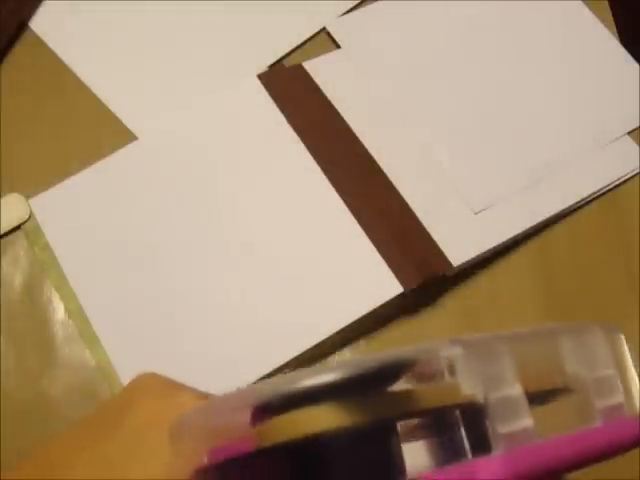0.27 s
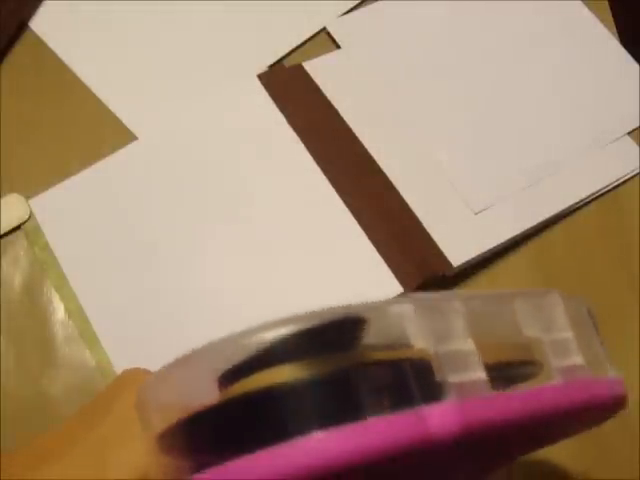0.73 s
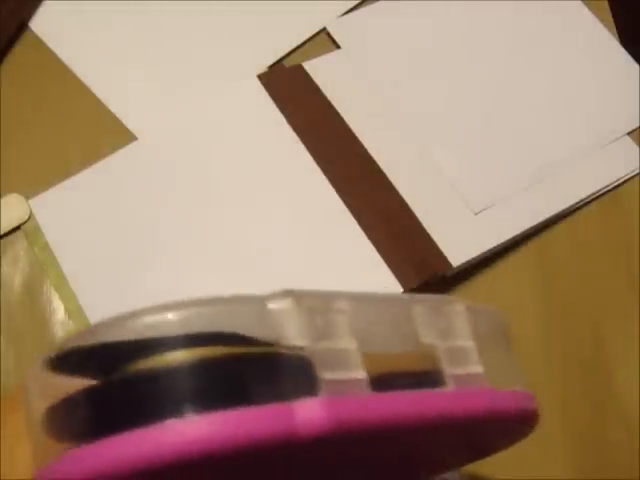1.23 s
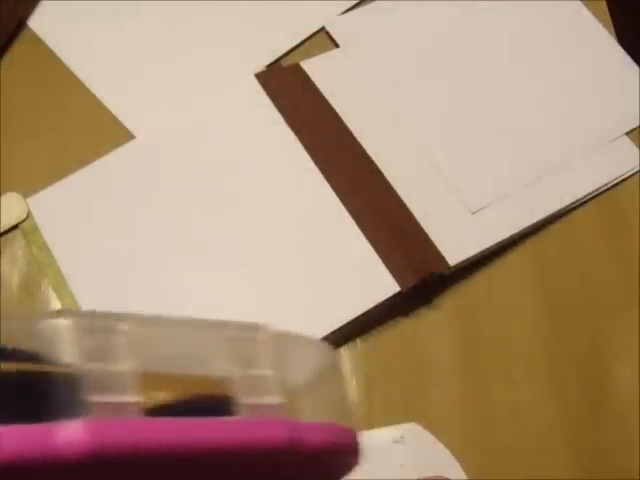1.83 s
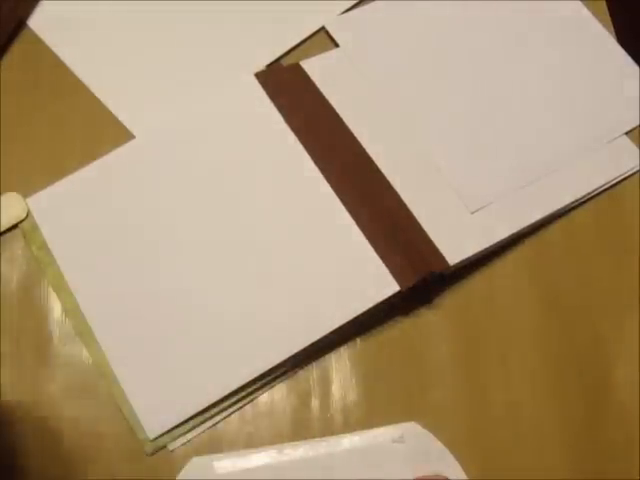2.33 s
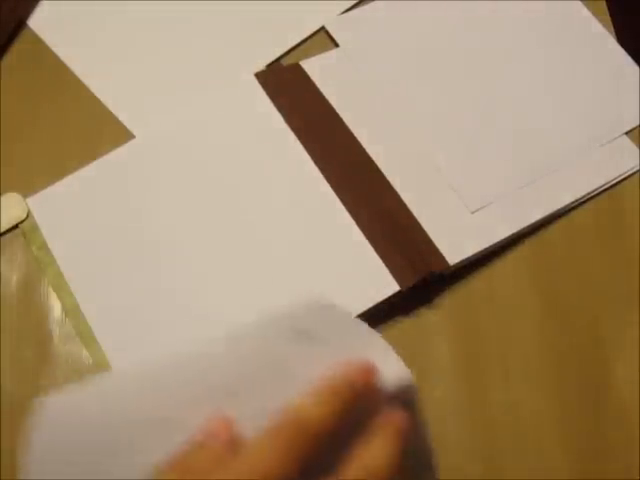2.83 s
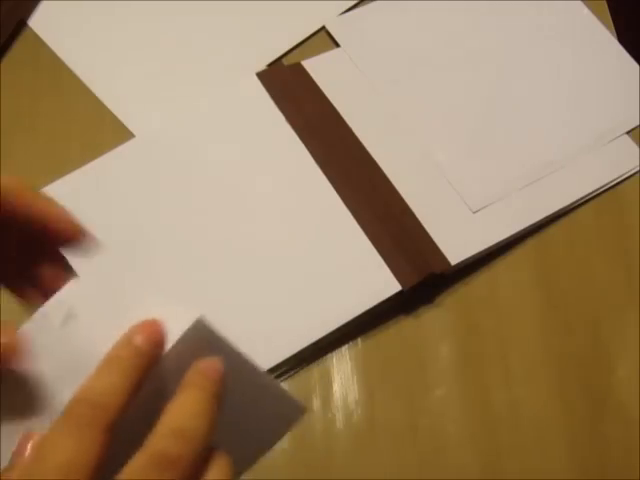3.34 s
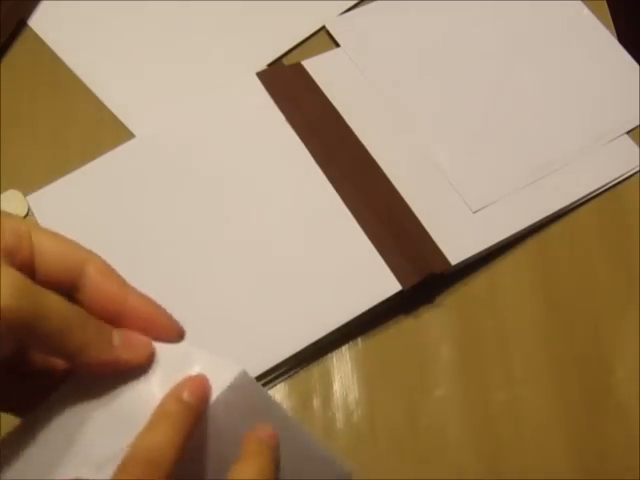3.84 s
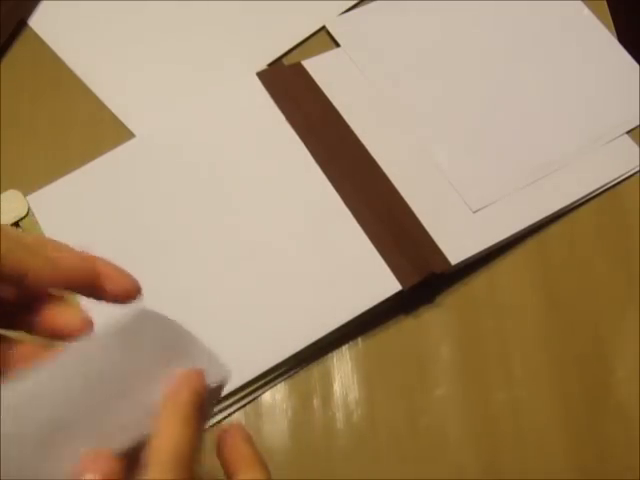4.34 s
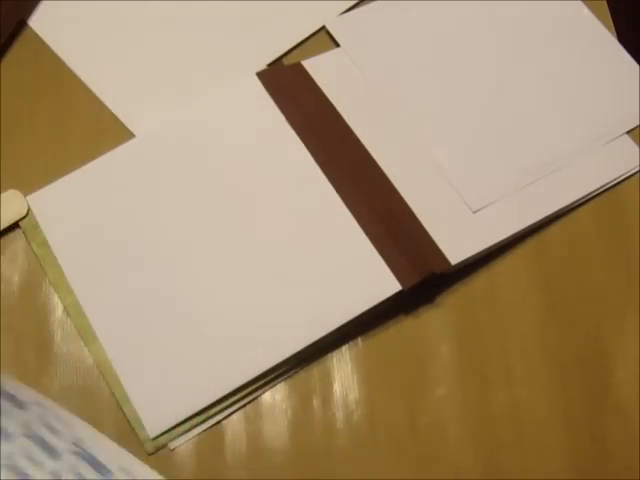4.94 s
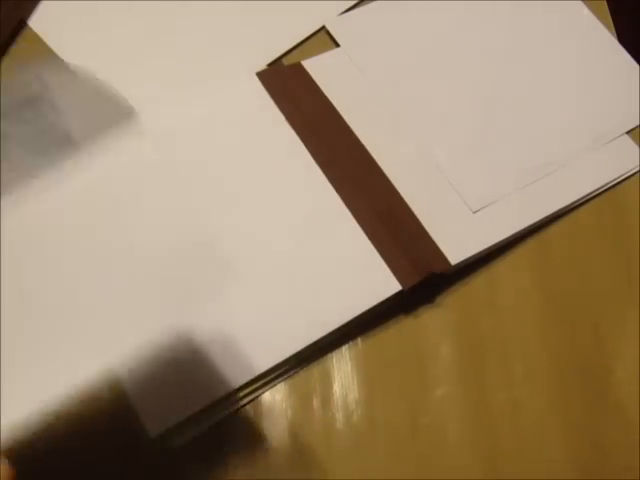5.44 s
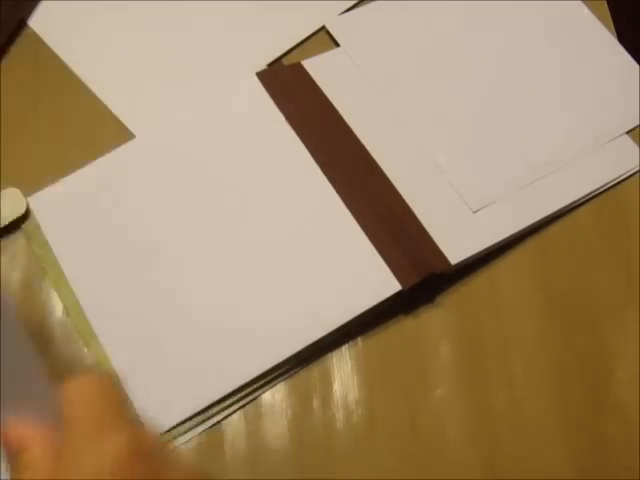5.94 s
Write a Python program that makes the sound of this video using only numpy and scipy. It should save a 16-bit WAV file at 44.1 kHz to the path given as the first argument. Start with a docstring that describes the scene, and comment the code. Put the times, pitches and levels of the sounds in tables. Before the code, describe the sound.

A low, steady rush of room air runs throughout, heard by one close microphone in a small room. For almost a second there is little else; around 0.95 s come tiny squeaks, then soft paper strokes and crisp snaps to 1.35 s, with a light knock. From about 1.6 to 1.9 s a tape gun rasps in quickening pulses, swelling and weakening over a thin hiss. At 2.05 s a brief rising squeak meets a hard plastic knock. After a pause, heavier clunks on the wooden table fall at 2.5-3.0 s, the strongest just before 3.0, then small knocks rattle away by 3.3 s. From 3.45 s paper ticks, rubs and pops, more briskly to 4.5 s. Between 4.8 and 5.75 s the sheet rustles and turns over with loud sharp snaps near 5.1 and 5.7 s, and a knock at 5.5. A last slide, soft knock and low flexing hum come around 6.05 s.

```python
"""A low steady rush fills a small room. At first paper slides and snaps, with faint squeaks and a knock.
Then a tape gun rasps in quick pulses and squeaks; it clatters on a wooden table and rocks to rest.
Last, the taped sheet is slid, pressed and turned over: it rustles, snaps and flexes, with two late knocks.
Rubbing and hits are shaped noise, snaps are ringing pushes, squeaks are gliding tones,
and the table rings with fading sine waves. One close microphone hears it all."""
import sys
import numpy as np
from scipy import signal
from scipy.fft import rfft, irfft
from scipy.io import wavfile
from scipy.ndimage import uniform_filter1d

SR = 44100
rng = np.random.default_rng(int(sys.argv[2]) if len(sys.argv) > 2 else 0)


def output_pcm(signal):
    """Save a mono or channel-first signal as 16-bit PCM at the path in sys.argv[1].

    Samples are clipped to [-1, 1] before scaling.
    """
    pcm = np.clip(np.atleast_2d(signal).T, -1, 1) * 32767
    wavfile.write(sys.argv[1], SR, np.round(pcm).astype(np.int16))


N = 272846

# colour of the room's steady rush: (frequency [Hz], relative level [dB])
RUSH_COLOUR = [(18, -65), (30, -33.5), (161, -12.5), (191, -12), (245, -8.5), (422, -7), (477, -8.5),
               (582, -4.5), (626, -7.5), (1130, -9), (2560, -13), (2900, -14.5), (4090, -19), (7980, -20.5),
               (11000, -27), (14300, -84), (22000, -120)]
# how long the room's echoes take to fade by 60 dB: (frequency [Hz], fading time [s])
ROOM_FADING = [(200, 0.34), (550, 0.31), (1400, 0.19), (3700, 0.29), (10000, 0.26)]
# strokes of sliding paper: (fastest moment [s], build-up [s], release [s], level [dB])
PAPER_STROKES = [(1.06, 0.19, 0.24, -46.5), (1.30, 0.22, 0.18, -42.5), (3.73, 0.12, 0.087, -43.5),
                 (3.91, 0.036, 0.061, -40), (4.135, .03, 0.046, -43), (4.225, 0.079, .1, -43),
                 (4.33, .13, 0.023, -36.5), (4.845, 0.087, 0.079, -38.5), (4.991, 0.11, .09, -38),
                 (5.085, 0.059, 0.041, -36), (5.441, 0.011, 0.023, -37), (5.485, 0.034, 0.096, -37),
                 (5.612, 0.072, 0.082, -39.5), (5.702, 0.044, 0.048, -34), (5.84, 0.08, .07, -44.5),
                 (6.049, 0.085, 0.11, -38)]
# colour of paper rubbing on paper: (frequency [Hz], relative level [dB])
PAPER_COLOUR = [(150, -13), (400, 1), (1000, -3.5), (2200, 1), (4500, -1.5), (7000, -2), (10000, -6.5)]
# tape and paper snapping:
# (time [s], level [dB], pitch [Hz], treble slope [dB per octave], bass slope [dB per octave])
SNAP_EVENTS = [(1.1007, -34, 7200, -1, -0.5), (1.216, -36.5, 4500, 4, 8), (1.2427, -36.5, 4970, 6, 16),
               (1.3095, -27.5, 4420, 11, 3.5), (1.3323, -21, 4230, 9.5, 0.5), (3.4523, -38, 3100, 11.5, 2),
               (3.7494, -20.5, 1140, 8, 0), (3.9054, -35.5, 2220, 11, 4), (3.9716, -35, 3000, 4.5, 2),
               (4.1154, -22.5, 2010, 13, 3), (4.3225, -24, 1320, 2.5, -2), (4.339, -31, 2900, 6, 1),
               (4.4805, -35, 2980, 8.5, -1.5), (4.8213, -37, 1990, 19, 1), (5.0274, -32.5, 5100, -4, -2),
               (5.052, -32.5, 5100, -2.5, 7), (5.092, -14.5, 3020, 3.5, -0.5), (5.4360, -33, 2170, 5, 11),
               (5.5767, -20.5, 2320, 1, 4.5), (5.7007, -14, 2470, 6.5, 12)]
# stick-slip squeaks and the hum of the flexing sheet:
# (middle [s], length [s], level [dB], start pitch [Hz], end pitch [Hz])
SQUEAK_EVENTS = [(0.955, 0.022, -40, 580, 624), (0.981, 0.011, -29.5, 596, 643),
                 (2.041, 0.014, -26, 1153, 1265), (2.039, 0.0082, -20, 2295, 3445),
                 (6.097, 0.022, -30, 220, 211)]
# short scrapes of the tape gun and the sheet's edge: (middle [s], length [s], level [dB], resonance [Hz])
SCRAPE_EVENTS = [(0.987, 0.021, -39, 2540), (1.595, 0.029, -41.5, 1570), (1.997, 0.01, -29.5, 1310),
                 (2.047, 0.016, -36, 3000), (3.921, 0.029, -37, 2150), (4.295, 0.024, -34.5, 2110),
                 (4.33, 0.015, -31.5, 900), (5.136, 0.015, -28, 1510), (5.475, 0.01, -24, 1480),
                 (5.491, 0.015, -24.5, 1140), (5.707, 0.017, -34, 2280), (6.076, 0.073, -41.5, 1750)]
# tape gun and hands knocking on the table:
# (time [s], level [dB], brightest [Hz], bass cut [Hz], level of the sharp crack [dB])
KNOCK_EVENTS = [(1.3318, -28, 2140, 354, -7.5), (2.0666, -14, 1550, 445, -10), (2.085, -37, 1300, 400, 6),
                (2.1023, -19.5, 1750, 504, -24), (2.1290, -36, 900, 420, -13),
                (2.4845, -34.5, 1130, 338, -16), (2.5816, -40, 980, 400, -6.5),
                (2.7353, -16, 1220, 240, 4.5), (2.7440, -15, 600, 190, -27),
                (2.7913, -21, 1350, 300, -10.5), (2.9724, -8.5, 1130, 414, -22),
                (3.0208, -16.5, 1650, 1160, -4), (3.4081, -44, 1600, 800, -21),
                (5.521, -29.5, 1300, 278, -2), (6.0520, -30.5, 980, 398, -14)]
# what the table and the tape gun ring with: (frequency [Hz], relative level [dB])
TABLE_MODES = [(208, 5), (268, -6), (378, -13), (435, 4), (506, 6.5), (658, 4), (745, 2.5), (818, -29),
               (1179, -3.5), (1290, 3.5), (1420, -20), (1560, -39), (1755, 2), (2090, -17)]
# colour of the sharp crack in a knock: (frequency [Hz], relative level [dB])
CRACK_COLOUR = [(200, -21), (900, -2), (2200, 0), (3800, 1.5), (5200, 3), (7000, -2), (10000, -12.5)]
# how long the clatter takes to fade by 60 dB: (frequency [Hz], fading time [s])
CLATTER_FADING = [(300, 0.073), (1200, 0.073), (3000, 0.03), (10000, 0.022)]

RUSH_DB = -50
EDGE_HZ = 11200  # the microphone passes little above this
# the hiss of the tape paying out, and the moment the hand presses most
TAPE_HISS_DB, TAPE_HISS_S, PRESS_S = -42.5, 0.1, 1.772
STROKE_CURVE = 1.64  # above 1, a stroke starts gently
# a taut sheet snaps loud and clean, a slack one shivers more: the level with no change, and the trade
SHIVER_EVEN_DB, SHIVER_SLOPE = -24, 0.88
# the roller slips in pulses: the settled gap, the extra first gap, and how much of it stays each time
ROLL_START_S, ROLL_GAP_S, ROLL_LAG_S, ROLL_SETTLE = 1.657, .0205, .0395, .19
# pulses are loudest at the press and weaken on both sides of it
PRESS_DB, PRESS_DB_PER_S, LIFT_DB_PER_S = -28, 102, 129
SLIP_SHARE, ROLL_HZ = 0.55, 1140  # slip length as a share of the gap, and its resonance
# once set down, the gun rocks to rest: each bounce comes sooner and weaker than the last
ROCK_START_S, ROCK_GAP_S, ROCK_SHRINK = 3.0885, .0348, .968
ROCK_DB, ROCK_STEP_DB = -28, -2.5
ROCK_HZ, ROCK_LOW_HZ, ROCK_CRACK_DB = 1410, 470, -12


def amp(db):
    """Turns decibels into a plain gain."""
    return 10 ** (np.asarray(db) / 20)


def evened(x):
    """Scales a sound to an average (rms) strength of 1."""
    return x / np.sqrt(np.mean(x ** 2) + 1e-20)


def struck(x):
    """Scales a hit to rms 1 over its first 5 ms."""
    return x / np.sqrt(np.mean(x[:SR // 200] ** 2) + 1e-20)


def read(points, hz):
    """Reads between the points of a table, on a log-frequency axis."""
    f, value = np.transpose(points)
    return np.interp(np.log(hz + 1), np.log(f), value)


def add(mix, s, sound):
    """Mixes a sound in, starting at s seconds."""
    part = mix[max(round(s * SR), 0):][:len(sound)]
    part += sound[:len(part)]


def bins(size):
    """Lists the frequencies of a spectrum, kept above zero."""
    return np.fft.rfftfreq(size, 1 / SR) + 1


def hill(f, hz, bass_db, treble_db):
    """Takes the lower of two slopes that cross at hz, in dB; the slopes are per octave."""
    octaves = np.log2(f / hz)
    return np.minimum(bass_db * octaves, -treble_db * octaves)


def peak(f, hz, height_db, width):
    """A resonance in dB, its half width given as a share of hz."""
    return height_db / (1 + ((f - hz) / (width * hz)) ** 2)


def low_cut(f, hz):
    """A small body sends out little sound below hz; the loss is in dB."""
    return -10 * np.log10(1 + (hz / f) ** 6)


def noise(db, size):
    """Makes noise of rms 1 with a given spectrum, by giving each frequency a random phase."""
    phase = np.exp(2j * np.pi * rng.random(len(db)))
    return evened(irfft(amp(db) * phase, size))


def click(db):
    """Makes the pulse that has a given spectrum and rings only after it starts."""
    log_gain = np.log(amp(np.maximum(db - db.max(), -70)))
    circle = np.concatenate([log_gain, log_gain[-2:0:-1]])
    # the Hilbert transform finds the phase that puts the energy as early as possible
    return np.fft.ifft(np.exp(np.conj(signal.hilbert(circle)))).real


def dying(x, fading):
    """Lets each band of x die away at its own speed."""
    hz, t, z = signal.stft(x, SR, nperseg=128)
    faded = z * amp(-60 * t / read(fading, hz)[:, None])
    return signal.istft(faded, SR, nperseg=128)[1][:len(x)]


def grains(size, per_s, spread_db):
    """Scatters sparse impulses of uneven strength, like fibres catching and letting go."""
    strength = amp(spread_db * np.minimum(rng.exponential(1, size), 4))
    chosen = rng.random(size) < per_s / SR
    return rng.standard_normal(size) * strength * chosen


def rush(hum_hz=590, hum_width_hz=12, hum_db=-64):
    """The steady air of the room is shaped noise; a narrow band of noise gives a faint wavering hum."""
    f = bins(N)
    hum = noise(-20 * np.log10(1 + ((f - hum_hz) / hum_width_hz) ** 2), N)
    return amp(RUSH_DB) * noise(read(RUSH_COLOUR, f), N) + amp(hum_db) * hum


def room(x, size=22050):
    """Scattered reflections build up over a few ms, then die away at a speed set for each band."""
    t, f = np.arange(size) / SR, bins(size)
    colour = hill(f, hz=2480, bass_db=-1, treble_db=3.5)
    taps = irfft(rfft(grains(size, per_s=4000, spread_db=3.5)) * amp(colour))
    tail = dying(taps, ROOM_FADING) * (1 - np.exp(-(t / 0.0044) ** 2))
    return signal.fftconvolve(x, tail / np.linalg.norm(tail))[:N]


def sliding_level(t):
    """Rubbing grows and stops with each paper stroke, and swells as tape pays out under the hand."""
    level = amp(TAPE_HISS_DB) * np.exp(-((t - PRESS_S) / TAPE_HISS_S) ** 2)
    for s, build, release, db in PAPER_STROKES:
        stroke = np.interp(t, [s - build, s, s + release], [0, 1, 0])
        level = level + amp(db) * stroke ** STROKE_CURVE
    return level


def slides():
    """Paper rubs with a fine hiss and coarser crinkles, coloured by an echo from the table just below."""
    level = sliding_level(np.arange(N) / SR)
    friction, f = rng.standard_normal(N), bins(N)
    for hz in np.geomspace(1500, 9500, num=8):  # each layer of crinkles has its own pitch
        colour = hill(f, hz, bass_db=2, treble_db=7.0)
        crinkles = rfft(grains(N, per_s=170, spread_db=3.0)) * amp(colour)
        friction = friction + amp(-9.5) * evened(irfft(crinkles, N))
    # the paper catches unevenly
    catch_db = 2.2 * evened(uniform_filter1d(rng.standard_normal(N), size=350))
    bounce = 1 + 0.26 * np.exp(-2j * np.pi * f * .0022)  # an echo 2.2 ms later
    spectrum = rfft(friction * amp(catch_db)) * amp(read(PAPER_COLOUR, f)) * bounce
    return level * evened(irfft(spectrum, N))


def snaps(size=4096):
    """The sheet buckles: one push rings a few cycles, then a brief shiver runs through the paper."""
    out, f, t = np.zeros(N), bins(size), np.arange(size) / SR
    for s, db, hz, treble_db, bass_db in SNAP_EVENTS:
        shiver_db = SHIVER_SLOPE * (SHIVER_EVEN_DB - db)
        # the second slope bends the treble further, higher up
        colour = hill(f, hz, bass_db, treble_db) + hill(f, 3.2 * hz, 0, treble_db)
        push = click(colour + peak(f, hz, height_db=7.0, width=0.093) + low_cut(f, hz=360))
        fade = amp(-15.0) * np.exp(-t / 0.0013) + amp(-30.5) * np.exp(-t / 0.015)
        shiver = amp(shiver_db) * rng.standard_normal(size) * fade
        shiver[0] = 1  # the push itself
        add(out, s, amp(db) * struck(signal.fftconvolve(push, shiver)[:size]))
    return out


def squeaks(size=8192, flutter=0.36):
    """Sticking and slipping gives short gliding tones, unsteady in pitch and strength."""
    out, t = np.zeros(N), (np.arange(size) - size / 2) / SR
    for s, length, db, start_hz, end_hz in SQUEAK_EVENTS:
        hz = np.interp(t, [-length / 2, length / 2], [start_hz, end_hz])
        wobbles = uniform_filter1d(rng.standard_normal((2, size)), size=40)
        jitter, grip = (evened(row) for row in wobbles)
        rough = hz / hz.clip(2500)  # high squeaks break up the most
        phase = 2 * np.pi * np.cumsum(hz * (1 + .035 * rough * jitter)) / SR
        overtone = amp(-17) * np.sin(2 * phase)
        tone = evened(np.sin(phase) * (1 + flutter * rough * grip) + overtone)
        add(out, s + t[0], amp(db) * tone * np.exp(-2 * (t / length) ** 2))
    return out


def rolling(count=9):
    """The tape roller slips as scrapes: shorter as it gathers speed, louder under pressure."""
    gaps = ROLL_GAP_S + ROLL_LAG_S * ROLL_SETTLE ** np.arange(count)
    times = ROLL_START_S + np.cumsum(gaps) - gaps
    before_db, after_db = PRESS_DB_PER_S * (times - PRESS_S), LIFT_DB_PER_S * (PRESS_S - times)
    levels = PRESS_DB + np.minimum(before_db, after_db)
    return [(s, SLIP_SHARE * gap, db, ROLL_HZ) for s, gap, db in zip(times, gaps, levels)]


def scrapes(size=8192):
    """Each slip is a swell of grains heard through a resonance of the case or the sheet."""
    out, f, t = np.zeros(N), bins(size), (np.arange(size) - size / 2) / SR
    for s, length, db, hz in SCRAPE_EVENTS + rolling():
        colour = hill(f, hz, bass_db=0.0, treble_db=4) + hill(f, hz=2770, bass_db=-1, treble_db=10)
        colour = colour + low_cut(f, hz=413) + peak(f, hz, height_db=6, width=0.07)
        grit = evened(irfft(rfft(grains(size, per_s=4200, spread_db=3.5)) * amp(colour)))
        swell = np.exp(-2 * (t / length) ** 2)
        slip = grit * swell
        # give every slip the energy of its swell
        add(out, s + t[0], amp(db) * slip * np.linalg.norm(swell) / np.linalg.norm(slip))
    return out


def rocking(count=6):
    """The gun rocks to rest in knocks that come sooner and weaker each time."""
    k = np.arange(count)
    gaps = ROCK_GAP_S * ROCK_SHRINK ** k
    times = ROCK_START_S + np.cumsum(gaps) - gaps
    levels = ROCK_DB + ROCK_STEP_DB * k
    return [(s, db, ROCK_HZ, ROCK_LOW_HZ, ROCK_CRACK_DB) for s, db in zip(times, levels)]


def knocks(size=16384, ring_t60=0.17, ring_db=-15):
    """A blow gives a hard crack, a dense clatter of the plastic case, and the ring of the table."""
    out, f, t = np.zeros(N), bins(size), np.arange(size) / SR
    mode_hz, mode_db = np.transpose(TABLE_MODES)[:, :, None]
    for s, db, hz, low_hz, crack_db in KNOCK_EVENTS + rocking():
        colour = hill(f, hz, bass_db=0.5, treble_db=5) + hill(f, hz=2380, bass_db=1, treble_db=11.5)
        colour = colour + low_cut(f, low_hz)
        # loose parts rattle
        chatter = amp(2.6 * evened(uniform_filter1d(rng.standard_normal(size), size=130)))
        clatter = dying(noise(colour, size) * chatter, CLATTER_FADING)
        # about twice the energy of a 5 ms burst of rms 1
        clatter *= 1.4 * np.sqrt(SR / 200) / np.linalg.norm(clatter)
        crack = struck(noise(read(CRACK_COLOUR, f), size) * np.exp(-t / 0.0043))
        # the hand's grip and the place of the blow shift each mode a little
        detune = 1 + .012 * rng.uniform(-1, 1, mode_hz.shape)
        sway = np.sin(2 * np.pi * (mode_hz * detune * t + rng.random(mode_hz.shape)))
        fade_db = -60 * t / ring_t60
        ring = (sway * amp(mode_db + np.interp(mode_hz, f, colour) + fade_db)).sum(0)
        contact = 1 - np.exp(-t / 0.00032)  # the force takes a moment to build
        blow = clatter + amp(crack_db) * crack + amp(ring_db) * ring
        add(out, s, amp(db) * contact * blow)
    # the table top is too small to send out deep bass
    return signal.sosfilt(signal.butter(4, 175, "highpass", fs=SR, output="sos"), out)


def scene():
    """Mixes the sources; the paper is nearest to the microphone, so it carries the least room."""
    paper, rasp, table = snaps() + slides(), scrapes() + squeaks(), knocks()
    wet = room(amp(-11.0) * table + amp(-25.0) * paper + amp(-14.5) * rasp)
    return (table + paper + rasp + wet + rush())[None]


def record(dry):
    """The microphone colours the treble, cuts off the tallest peaks and limits the band."""
    # (frequency [Hz], gain [dB])
    colour = [(4000, -0.5), (5100, -1.5), (5800, -4.0), (7000, -4.5), (9300, 0.5), (11000, -2)]
    ceiling = .92
    coloured = irfft(rfft(dry) * amp(read(colour, bins(N))), N)
    heard = np.clip(coloured, -ceiling, ceiling)
    band_limit = signal.firwin(401, EDGE_HZ, window=("kaiser", 7), fs=SR)
    return signal.oaconvolve(heard, band_limit[None], "same")


dry = scene()
out = record(dry)
output_pcm(out)
```